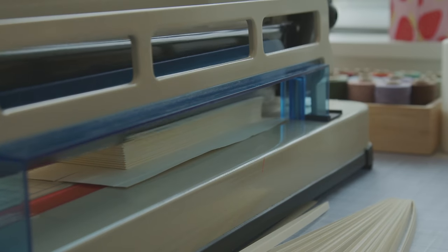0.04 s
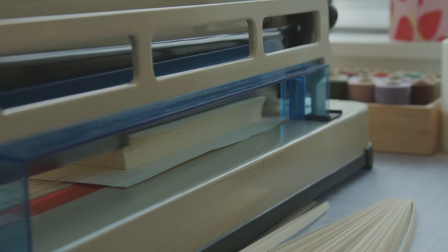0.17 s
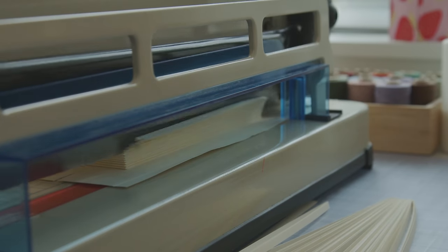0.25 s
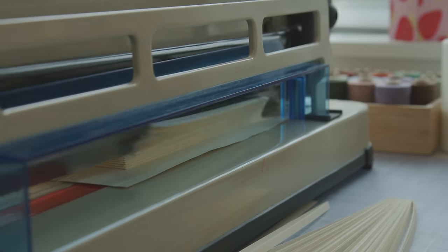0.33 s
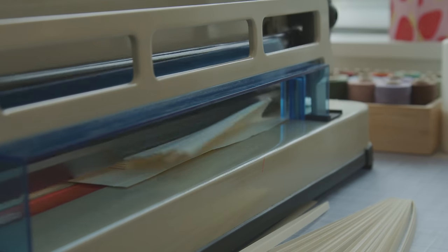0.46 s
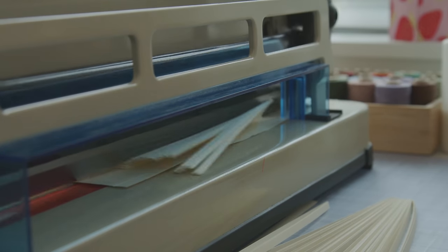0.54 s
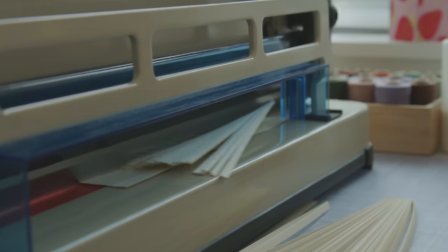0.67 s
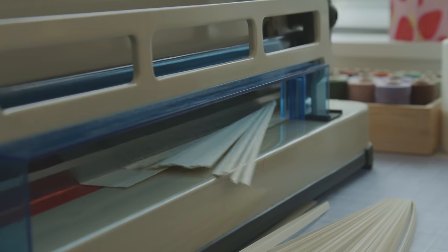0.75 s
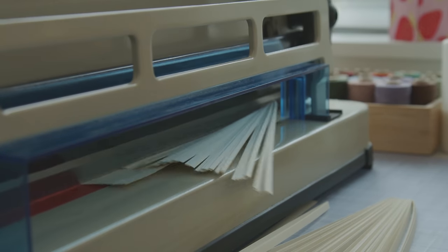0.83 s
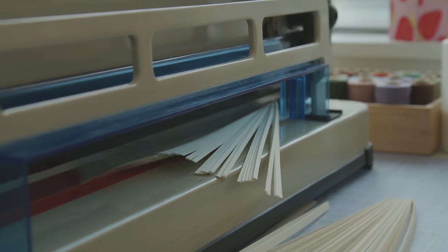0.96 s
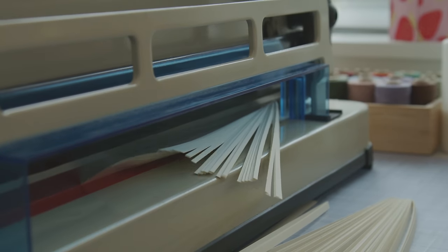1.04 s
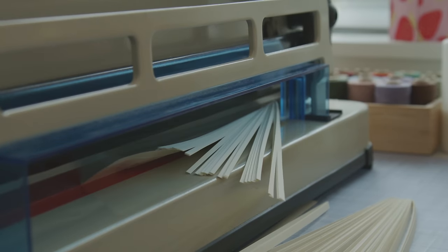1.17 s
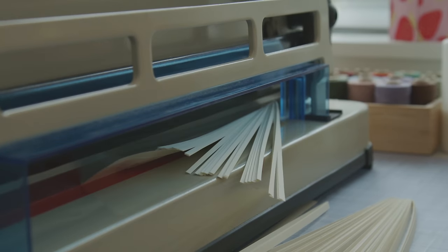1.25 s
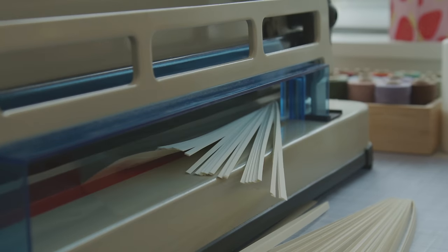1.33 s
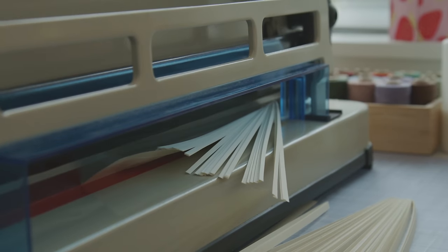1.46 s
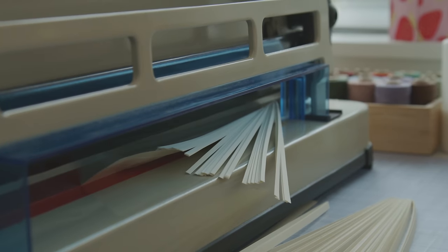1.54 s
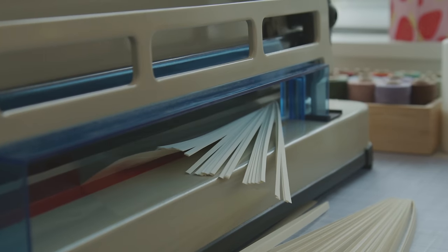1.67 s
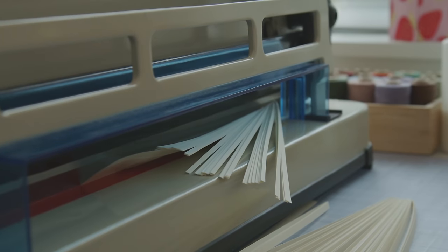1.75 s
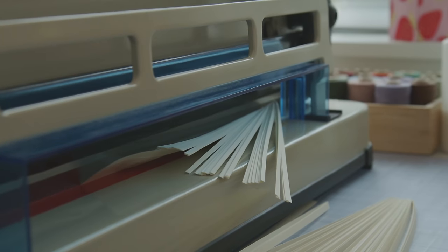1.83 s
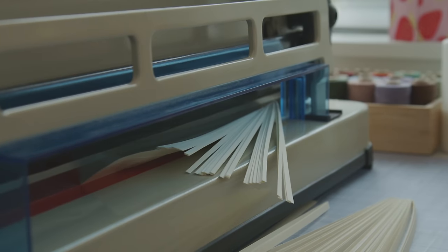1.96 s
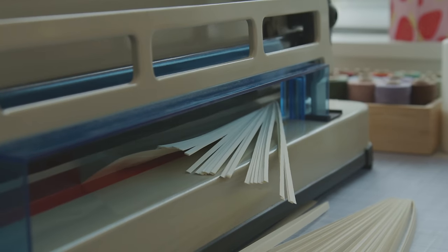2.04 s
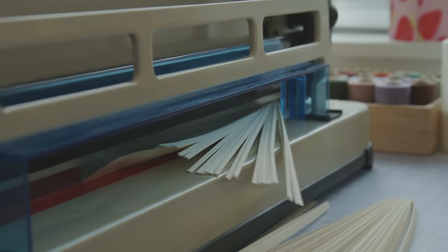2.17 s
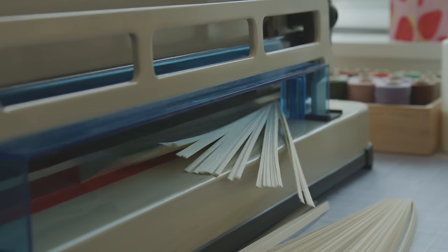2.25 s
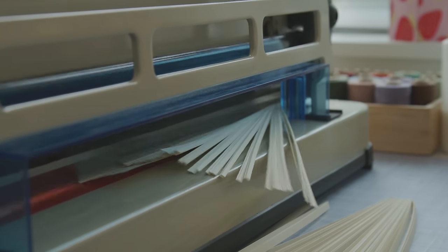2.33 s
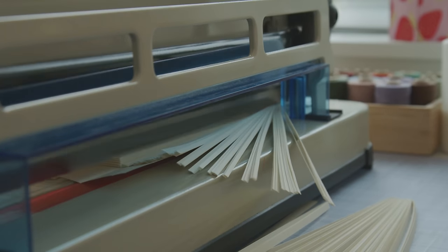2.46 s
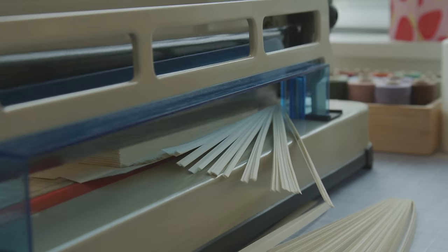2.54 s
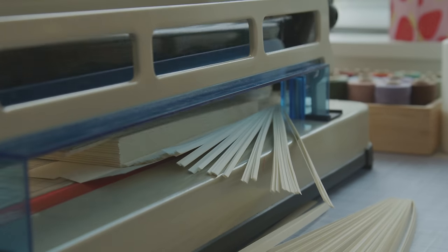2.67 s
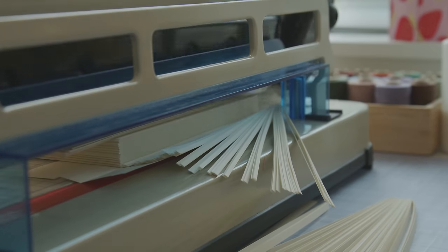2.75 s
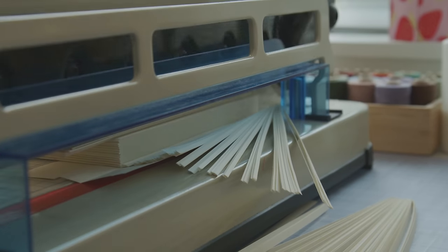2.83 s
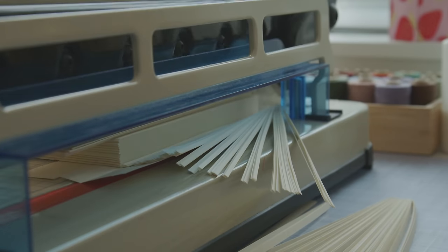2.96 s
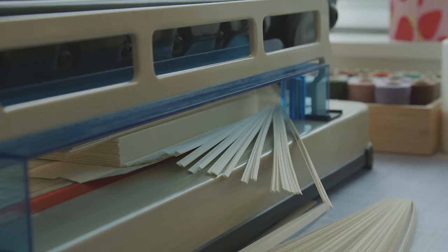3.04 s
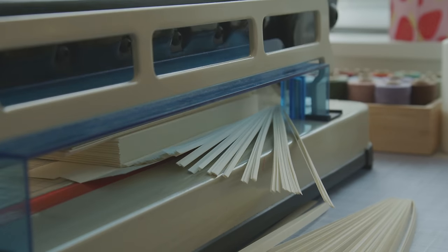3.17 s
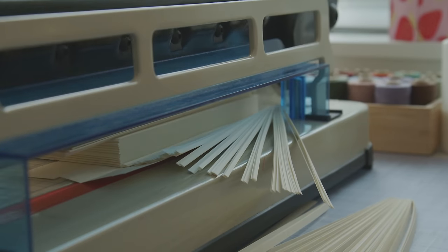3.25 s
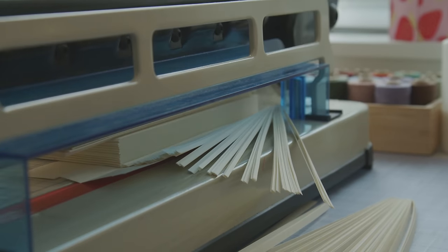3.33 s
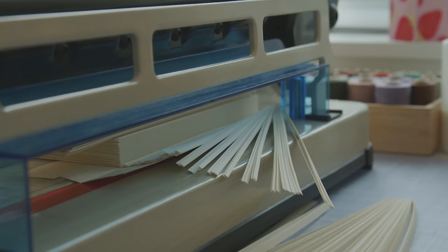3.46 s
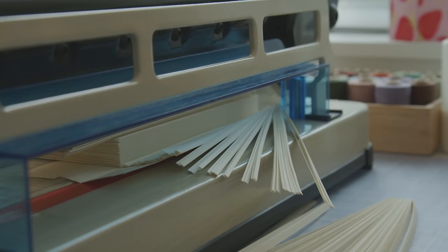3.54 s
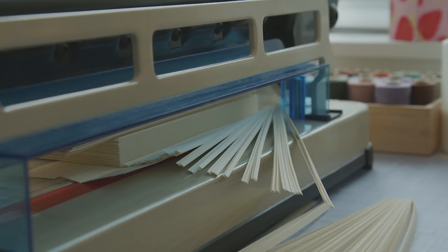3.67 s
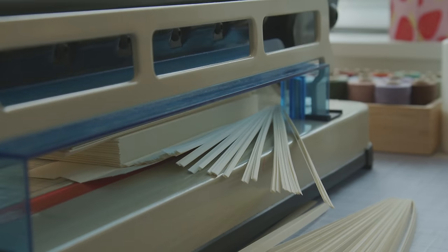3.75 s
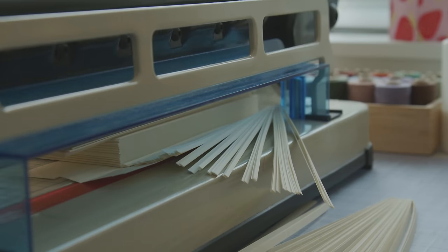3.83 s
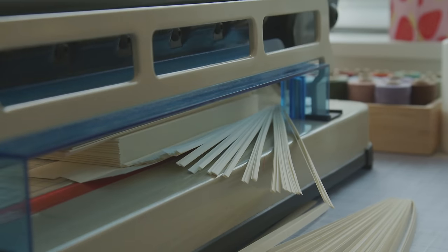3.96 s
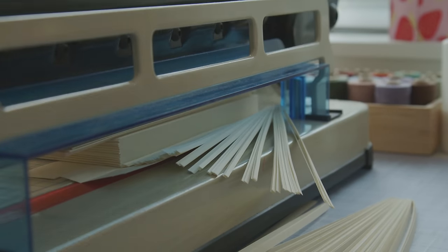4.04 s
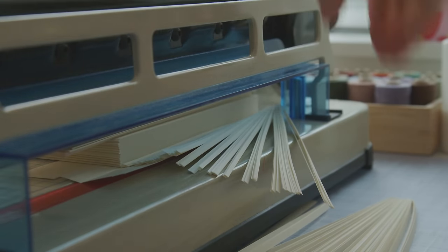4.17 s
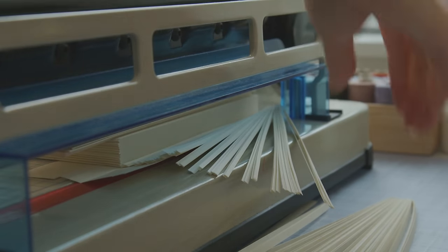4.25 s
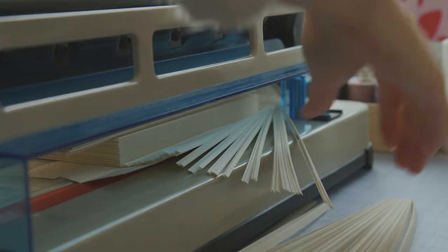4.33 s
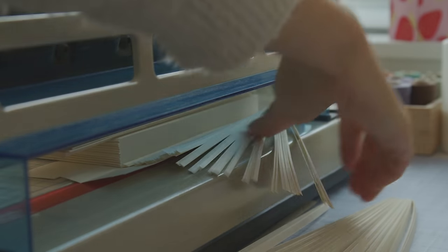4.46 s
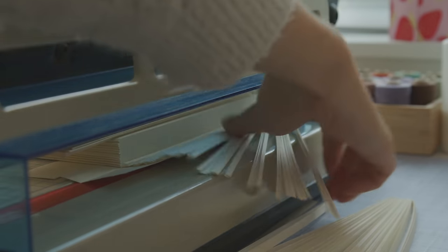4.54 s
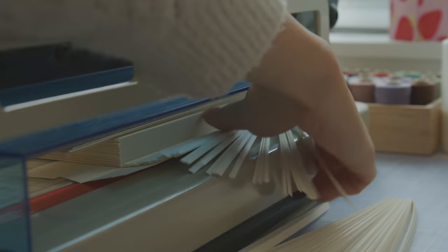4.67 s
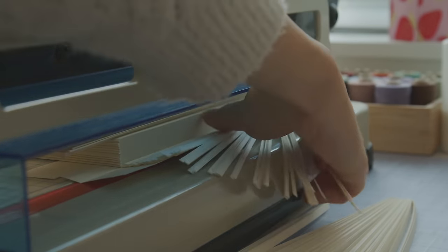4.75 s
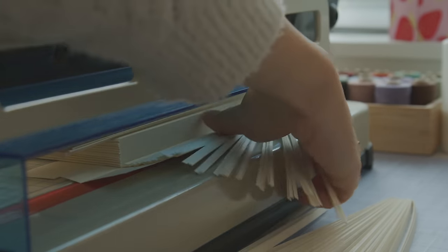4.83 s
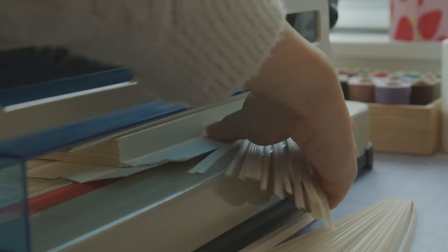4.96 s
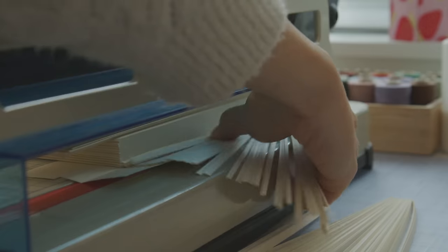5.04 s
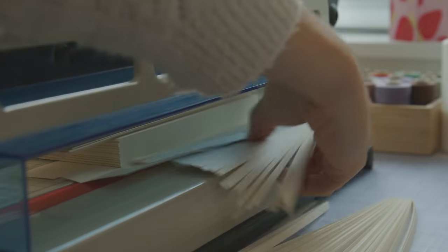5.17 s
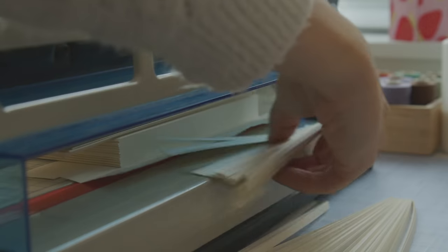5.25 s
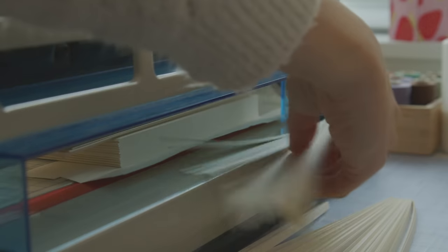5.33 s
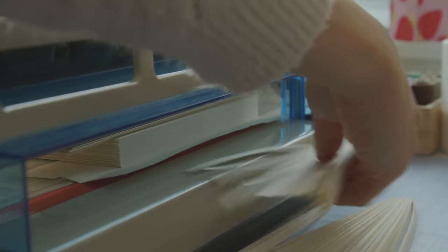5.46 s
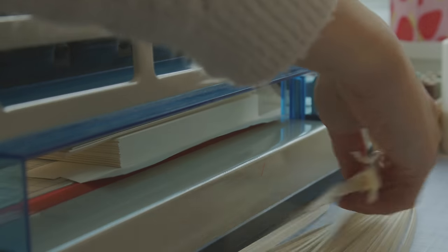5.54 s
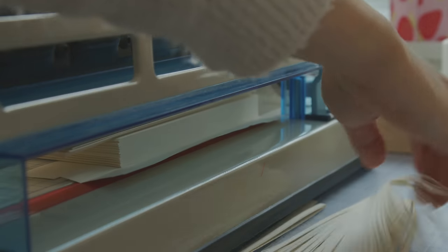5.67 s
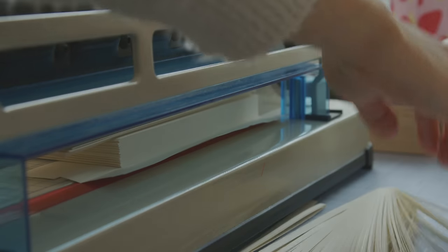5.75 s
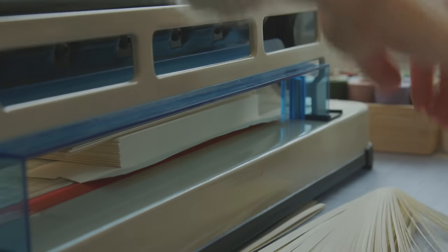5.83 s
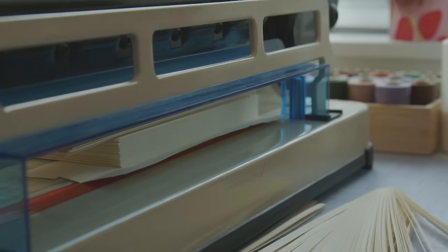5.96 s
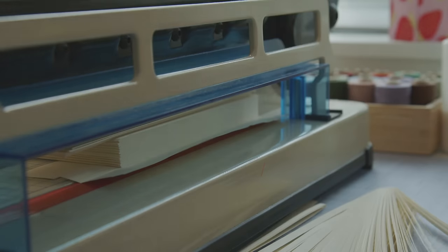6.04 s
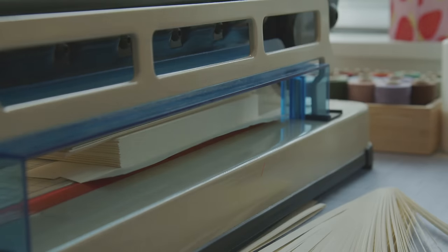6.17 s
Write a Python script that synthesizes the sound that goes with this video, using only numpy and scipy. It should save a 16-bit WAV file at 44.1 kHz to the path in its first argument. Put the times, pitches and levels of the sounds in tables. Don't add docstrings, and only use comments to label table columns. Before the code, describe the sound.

A lever paper cutter grinds through a thick stack, ratchets back, thuds and clunks home ringing, then a clamp knocks and cut paper strips rustle.

```python
import sys
import numpy as np
from scipy import signal
from scipy.fft import rfft, irfft, next_fast_len
from scipy.io import wavfile
from scipy.ndimage import map_coordinates

SR = 44100
rng = np.random.default_rng(int(sys.argv[2]) if len(sys.argv) > 2 else 0)


def wav_out(sig):
    wavfile.write(sys.argv[1], SR, np.round(np.clip(np.atleast_2d(sig).T, -1, 1) * 32767).astype(np.int16))


def voltage_ratio(decibels):
    exponent = np.asarray(decibels, float) / 20
    return 10 ** exponent


N = 273287


def unit(x):
    return x / np.sqrt(np.mean(x ** 2) + 1e-20)


def along(points, hz):
    f, v = np.transpose(points)
    return np.interp(np.log(hz + 1), np.log(f + 1), v)


def wobble(rate):
    knots = rng.standard_normal(int(N * rate / SR) + 4)
    return map_coordinates(knots, [np.arange(N) * rate / SR])


def filtered(x, response):
    m = next_fast_len(N + SR // 2)
    return irfft(rfft(x, m) * response(np.fft.rfftfreq(m, 1 / SR)), m)[..., :N]


def peak(f, hz, width):
    return 1j * f * width / (hz * hz - f * f + 1j * f * width)


def notched(x, notches):
    def response(f):
        return np.prod([1 - depth * peak(f, hz, width) for hz, width, depth in notches], axis=0)
    return filtered(x, response)


def body(x, modes):
    def response(f):
        h = sum((-1) ** k * voltage_ratio(db) * peak(f, hz, width) for k, (hz, width, db) in enumerate(modes))
        low, high = .8 * modes[0][0], 1.25 * modes[-1][0]
        h = h * ((1j * f / low) / (1 + 1j * f / low) / (1 + 1j * f / high)) ** 3
        return h / np.sqrt(np.mean(abs(h) ** 2))
    return filtered(x, response)


def friction(levels_db, grain_db, judder_db, surge_db=1, chatter_db=0):
    judder = judder_db * wobble(60) + chatter_db * wobble(350)
    shape = (len(levels_db), N)
    slips = voltage_ratio(grain_db * rng.exponential(size=shape)) * rng.standard_normal(shape)
    rows = [voltage_ratio(db) * unit(voltage_ratio(judder + surge_db * wobble(18)) * slip) for db, slip in zip(levels_db, slips)]
    return np.array(rows)


def strokes(rows):
    flank_power = 1.136
    t, power = np.arange(N) / SR, np.full((2, N), 1e-15)
    for s, db, rise, fall, second_db in rows:
        away = np.where(t < s, (s - t) / rise, (t - s) / fall)
        power += voltage_ratio(2 * (db - 20 * away ** flank_power)) * voltage_ratio([[0], [2 * second_db]])
    return 10 * np.log10(power)


def contacts(rows, tick_share=0.71, lead=0, rise=0.00024):
    force, t = np.zeros((4, N + SR)), np.arange(SR // 12) / SR
    for s, plate_db, frame_db, shell_db, tick_db, length in rows:
        life = length * np.array([[1.1], [1], [.9], [tick_share]]) + 0.00043
        burst = np.exp(-t / life) * (1 - np.exp(-t / rise)) * rng.standard_normal((4, len(t)))
        burst *= np.sqrt(1 + np.array([[.012], [.007], [.001], [0]]) / life)
        levels = voltage_ratio([[frame_db], [plate_db], [shell_db], [tick_db]])
        force[:, round((s - lead) * SR):][:, :len(t)] += levels * burst
    return force[:, :N]


def blows(rows, tick_db):
    return [(s, db, db + weight, db + hard, db + hard + tick_db, length)
            for s, db, weight, hard, length in rows]


def crackles(rows, length, plate_db, frame_db):
    return [(s, db + load + plate_db, db + load + frame_db, db, db + crisp, length)
            for s, db, crisp, load in rows]


def rings(rows, rise):
    out, t = np.zeros(N + 2 * SR), np.arange(SR) / SR
    for s, hz, db, t60 in rows:
        swell = 1 - np.exp(-t / max(rise, 1 / hz))
        out[round(s * SR):][:SR] += voltage_ratio(db - 60 * t / t60) * swell * np.sin(2 * np.pi * hz * t)
    return out[:N]


def push(force, names, rows):
    for name, row in zip(names, rows):
        force[name] += row


# pitch_hz, width_hz, level_db
FRAME = [(134, 13, -17), (191, 14, -16.5), (232.7, 24, -6), (277.4, 31.2, -3), (348, 22, 4), (405, 42, -2),
         (443.8, 27, -0.5), (538, 35, -4), (649, 48, -5)]
PLATE = [(727, 91, 0.5), (802.6, 38.4, 8.5), (893, 53, 4), (958, 56, 6), (1082, 57, 5), (1134, 45, 3),
         (1268, 50, -2), (1330, 40, -0.5), (1406, 36, 0), (1553, 43, -1.5), (1660, 1200, -7.5)]
SHELL = [(1680, 80, 3.5), (1903, 90, 4.5), (2037, 215, 1), (2330, 44, -4), (2804, 200, -2), (3246, 220, -2),
         (3465, 330, -4), (4200, 680, -4.5), (5050, 900, -12)]
FIBRE = [(6450, 3300, -4), (9120, 1940, 0), (11200, 2900, -4), (13000, 4900, -21)]
TABLE = [(67, 24, -3), (100, 20.5, 1.5), (134, 14, 3.5), (165, 55, 0.5), (207, 14, 0)]
SHEET = [(1576, 620, -3), (3410, 800, -1), (4300, 950, 3), (5010, 1020, -1.5)]
HISS = [(6470, 2300, 0), (8360, 3060, 3.5), (10960, 5200, -1), (15000, 3200, -9.5)]
CLAMP = [(1500, 460, 1), (2050, 330, 3), (2600, 170, -3), (3080, 480, -2), (4000, 640, -3),
         (4620, 570, -4.5)]
EDGE = [(8900, 300, 0)]
PARTS = dict(frame=FRAME, plate=PLATE, shell=SHELL, fibre=FIBRE, table=TABLE,
             sheet=SHEET, hiss=HISS, clamp=CLAMP, edge=EDGE)


def resound(force, names):
    return voltage_ratio(-1.5) * sum(body(force[name], PARTS[name]) for name in names)


# pitch_hz, level_db (per Hz)
AIR = [(25, -23.5), (50, -34.5), (65, -11), (160, -2), (250, 3), (400, -10.5), (750, -1), (1000, -12),
       (1400, -6), (2000, -11), (3200, -16.5), (5000, -28.5), (10000, -29), (15500, -32.5)]


def air():
    hush = filtered(rng.standard_normal(N), lambda hz: voltage_ratio(along(AIR, hz)))
    return voltage_ratio(-66 + wobble(3) + wobble(15)) * unit(hush)


# pitch_hz, t60_s
ROOM = [(200, 0.24), (1000, 0.23), (4000, 0.29), (12000, 0.17)]


def room(x):
    out, step = np.zeros(N + 2 * SR), SR // 4
    for start in range(0, N, step):
        hz, t, z = signal.stft(rng.standard_normal(SR // 2), SR, nperseg=256)
        decay = voltage_ratio(-60 * t / along(ROOM, hz)[:, None])
        tail = signal.istft(z * decay, SR, nperseg=256)[1]
        wet = signal.fftconvolve(x[start:start + step], tail / np.linalg.norm(tail))
        out[start + SR // 200:][:len(wet)] += wet
    return out[:N]


# time_s, level_db
CUT = [
    (0, -38),
    (.07, -38.5),
    (.255, -33),
    (.36, -33.5),
    (.47, -31.5),
    (.62, -34.5),
    (.78, -40),
    (.865, -46),
    (.9, -68),
]
# over_db (over the force), swing_share, drift_db_per_s (as the stack thins)
CUT_PARTS = [
    (-2, 0.9, 0.5),
    (1.5, 1.05, -1.8),
    (-5.5, 1.12, -9.5),
    (-12.5, 1.17, -6.5),
    (-29, 0.91, 15),
]


def shearing_db():
    t, (s, db) = np.arange(N) / SR, np.transpose(CUT)
    force_db = np.interp(t, s, db, right=-200)
    return [db.max() + over + share * (force_db - db.max()) + drift * t for over, share, drift in CUT_PARTS]


def shear(force):
    rubbing = friction(shearing_db(), grain_db=2.5, judder_db=1.1, surge_db=.4, chatter_db=1.1)
    push(force, ["frame", "plate", "shell", "fibre", "table"], rubbing)


# peak_s, level_db, rise_s, fall_s (both over 20 dB), second_db (unused)
SQUEAL = [
    (.07, -62, .1, .08, 0),
    (.3, -60, .06, .1, 0),
    (.44, -52, .07, .09, 0),
    (.56, -59, .05, .12, 0),
]


def squeal(force):
    push(force, ["edge"], friction(strokes(SQUEAL)[:1], grain_db=0, judder_db=1))


# peak_s, level_db (frame), rise_s, fall_s (both over 20 dB), second_db (plate over frame)
MOVES = [(1.0, -56, 0.41, 0.06, 2.5), (1.16, -58.5, 0.22, 0.24, -5.5), (1.45, -69.5, 0.25, .5, -15),
         (2.11, -57.5, 0.15, 0.92, -4), (2.36, -51.5, 0.15, 0.072, -5), (2.7, -54.5, 0.58, 0.69, -0.7),
         (3.38, -61, 0.52, 0.24, -2.3), (3.52, -55, 0.11, 0.27, -1), (3.85, -67.5, .6, 1, -8),
         (4.7, -57.5, 0.088, 0.53, 0.5), (5.1, -64.5, 0.48, 0.78, 0), (5.71, -63.5, 0.52, 0.32, -16),
         (6.0, -71, 0.78, 0.59, 0.5)]
# same columns, second_db unused
SHAKES = [
    (.34, -50.5, 0.12, 0.11, 0),
    (1.3, -72.5, 0.86, 0.76, 0),
    (.85, -72, .3, 0.23, 0),
    (1.05, -65, 0.044, .06, 0),
    (1.19, -65, .03, .08, 0),
    (1.67, -66, 0.04, 0.21, 0),
    (2.21, -60, .05, .15, 0),
    (2.385, -51, 0.032, 0.1, 0),
    (3.5, -60, 0.13, 0.22, 0),
]


def lever(force):
    travel_db = np.maximum(strokes(MOVES), [[-70], [-120]])
    rubbing = friction([*travel_db, strokes(SHAKES)[0]], grain_db=1.5, judder_db=1.5)
    push(force, ["frame", "plate", "table"], rubbing)
    force["table"] += voltage_ratio(-15.5) * rubbing[0]


# start_s, level_db (sheet), crisp_db (hiss over sheet), load_db (steel over sheet)
SNAPS = [(.102, -54, 7.5, 5), (.111, -53, 8, 0), (.182, -48, 12.5, -10), (.198, -50, 10, -5),
         (.211, -53, 11, -5), (.244, -54, 3, 25), (.26, -53, 3, 25), (.272, -50, 7, 2),
         (.348, -54.5, 4, 16), (.381, -48, 7.5, 15), (.425, -53, 5, 20), (.467, -52.5, 7, 12),
         (.53, -55, 1, 24), (.666, -56, 6, 10), (.707, -50, 6, 3), (.722, -59, 5, 7), (.769, -54, 6, 5),
         (.788, -55, 6, 8), (.808, -57, 6, 5), (.222, -45, 10, -5), (.62, -46.5, 4, 4),
         (.484, -49.5, 12, 14), (.522, -48, 8.5, 0), (.544, -37.5, 8, 4), (.696, -48, -1, 14.5),
         (.731, -49.5, 9.5, 11), (.739, -44, 4.5, 9), (.832, -48, 5.5, 7.5), (.859, -48, 1.5, 5.5),
         (4.94, -36.5, 1, -11.5)]


def snaps(force):
    rows = crackles(SNAPS, 0.0057, plate_db=-4.5, frame_db=-5.5)
    push(force, ["frame", "plate", "sheet", "hiss"], contacts(rows, tick_share=0.62))


# peak_s, level_db (sheet), rise_s, fall_s (both over 20 dB), second_db (hiss over sheet)
SLIDES = [(.96, -66, 0.2, 0.16, -3), (1.196, -63.5, 0.12, 0.14, -1.5), (2.36, -63, 0.15, 0.1, 2),
          (2.5, -67, .3, .4, -10), (2.79, -56, 0.039, 0.24, 1.5), (2.9, -54, 0.25, 0.15, 1),
          (3.222, -69, 0.42, 0.2, -6), (4.95, -50.5, .008, 0.082, -14), (5.2, -46, 0.23, 0.21, -5),
          (5.784, -63, 0.24, 0.21, -9), (6.1, -78, .55, .55, -8)]
BRUSHES = [(1.128, -63.5, .03, .03, -1), (3.74, -71.5, 0.033, 0.087, -10), (3.55, -62.5, .03, 0.1, -12),
           (3.78, -61, 0.075, 0.029, -2), (3.97, -71.5, 0.21, 0.28, -7.5), (4.575, -59.5, 0.055, .055, -2),
           (4.65, -58, 0.082, 0.057, -3.5), (5.622, -56, .009, .012, 4), (5.646, -54, .018, .014, 4),
           (5.756, -48, .005, .012, 5), (5.765, -46, .005, .014, 7), (5.773, -49, .014, .012, 6),
           (5.69, -70, .12, .1, 0)]


def sliding_db():
    return strokes(SLIDES + BRUSHES)


def slide(force):
    push(force, ["sheet", "hiss"], friction(sliding_db(), grain_db=2.0, judder_db=1.4))


def fibres(force):
    fibres_per_s, spread_db, tear_db, catch_db = 64, 14, -2, 2.5
    loudest_db = np.maximum(shearing_db()[2] + tear_db, sliding_db()[0] + catch_db)
    draw = rng.random((600, 2))
    at = np.cumsum(-np.log(draw[:, 0])) / fibres_per_s
    size_db = np.interp(at * SR, np.arange(N), loudest_db, right=-150) - spread_db * np.sqrt(draw[:, 1])
    rows = [(s, db, 3, -8) for s, db in zip(at, size_db) if db > -75]
    loose = crackles(rows, 0.0021, plate_db=-7, frame_db=-5.5)
    push(force, ["frame", "plate", "sheet", "hiss"], contacts(loose, tick_share=0.62))


# start_s, pitch_hz, level_db, t60_s
KNOCKS = [(1.1675, 13000, -42, .008), (1.1675, 6800, -45, .01), (1.652, 2550, -42, .03),
          (1.168, 2950, -29.5, .035), (1.172, 348, -35.5, 0.051), (1.652, 950, -36, 0.041),
          (2.196, 910, -29, 0.036), (2.334, 1080, -33, .08), (2.3797, 365, -12, 0.032),
          (2.382, 265, -24, .05), (2.382, 540, -24, .04), (2.416, 350, -26, .06), (2.339, 350, -36, .06),
          (2.354, 360, -35, .06), (2.39, 960, -22, .03), (2.381, 940, -20.5, 0.045),
          (2.405, 350, -23, 0.05), (2.437, 360, -31, .06), (2.5, 365, -48.5, .5), (2.69, 372, -48.5, .4),
          (.987, 1080, -40.5, 0.14), (2.795, 910, -34.5, 0.042), (3.33, 380, -46.5, 0.16),
          (4.689, 806, -21.5, 0.083), (3.432, 1075, -31, .08), (2.797, 2300, -42, .04),
          (2.212, 290, -34.5, 0.075), (4.673, 325, -28.5, 0.12), (4.682, 410, -27.5, 0.096),
          (4.676, 1500, -33, .06), (1.168, 1800, -35.5, 0.047), (1.652, 1800, -33, .04),
          (2.335, 1950, -39.5, 0.08), (2.388, 1075, -32, 0.037), (4.682, 2050, -28, 0.04),
          (4.722, 350, -34, .06), (4.744, 380, -35, .05), (4.8, 370, -42, .06), (3.473, 400, -31, .07),
          (4.783, 348, -44, .12), (5.252, 1700, -45.5, .09), (5.64, 690, -52, .08), (5.724, 600, -46, 0.11),
          (5.398, 347, -45.5, 0.054), (5.434, 4700, -46, .03), (4.943, 4300, -39, 0.026),
          (5.74, 235, -52, 0.17), (1.17, 235, -43.5, .08), (4.675, 600, -32.5, 0.077),
          (5.434, 1700, -49, .04), (3.0, 4300, -61, 0.14), (3.405, 960, -34.5, 0.065)]


def knocks():
    return rings(KNOCKS, rise=.002)


# start_s, level_db (plate), weight_db (frame over plate), hard_db (shell over plate), contact_s
STOPS = [(.992, -41.5, -14.5, -14.5, 0.0056), (1.052, -72, 20.5, -9, 0.0072),
         (1.127, -54.5, 2.5, -3, 0.006), (1.416, -77, 21.5, -6, .0058), (1.474, -70.5, 11.5, .3, 0.0036),
         (1.6015, -56, -9, -8, 0.004), (1.65, -34.5, 0, -4.5, 0.0064), (1.697, -51.5, -2, -17, 0.0089),
         (1.72, -50, -2, -16, 0.0033), (2.196, -34.5, -6.5, -1.4, 0.0074), (2.211, -38, -6.5, -24, 0.013),
         (2.332, -40, -8, -12, 0.011)]


def stops(force):
    push(force, ["frame", "plate", "shell", "fibre"], contacts(blows(STOPS, tick_db=-2.5)))


# start_s, level_db (plate), weight_db (frame), hard_db (shell), contact_s
THUD = [(1.1675, -36.5, -1, 1, 0.009), (2.3755, -32.5, -21, -4, 0.0028), (2.3805, -29.5, 1, -19, 0.004),
        (2.391, -36.5, -5, -9, 0.0012), (2.406, -52, 12, -9, 0.0022), (2.434, -54, 13, -12, 0.0033),
        (1.187, -45.5, -9, 0, 0.014), (1.215, -51.5, -10, 0.5, 0.012), (2.795, -43, -18, 2.2, 0.003),
        (2.868, -48.5, -21.5, 5, 0.004), (2.895, -52, -5, -3, 0.004)]


def thuds(force):
    push(force, ["frame", "plate", "shell", "fibre"], contacts(blows(THUD, tick_db=-12.5)))


# start_s, level_db (sheet), crisp_db (hiss over sheet)
TICKS = [(1.483, -70.5, 8), (1.834, -69, 1), (1.961, -74, 2), (3.581, -63, 0.5), (3.627, -70, 4),
         (3.66, -66, -16), (3.70, -58, -6), (5.172, -48, 4), (5.227, -52, 3), (5.212, -52, 0),
         (5.308, -50, 0), (5.15, -50, 6), (5.196, -46, 0), (5.287, -49, 0), (5.33, -54, -2),
         (5.348, -54.5, -2), (5.874, -67, 8), (5.911, -71.5, 7), (6.018, -73, 6)]


def ticks(force):
    rows = crackles([(*row, 0) for row in TICKS], 0.0015, plate_db=0, frame_db=0)
    push(force, ["sheet", "hiss"], contacts(rows)[2:])


# start_s, level_db (plate), weight_db (frame), hard_db (shell), contact_s
RATCHET = [
    (1.903, -33, -15, -38, 0.012),
    (1.934, -47, -3, -37, 0.0047),
    (2.006, -34.5, -9, -46, 0.013),
    (2.045, -45, -2, -40, 0.0043),
    (2.103, -30.5, -30, -26.5, 0.0081),
    (2.117, -39, -4, -35, 0.0044),
    (2.133, -43.5, 4.5, -30, 0.0042),
]
# pitch_hz, level_db, t60_s
TOOTH = [(880, 0, .026), (1030, 1, .03), (1600, -11, .022), (2150, -13, .018), (2550, -19, .012),
         (3200, -24, .01)]
# pitch_hz, t60_s
PAWL = (6590, .12)


def ratchet(force):
    shares = voltage_ratio([[-8], [-14], [-1]])
    hits = contacts(blows(RATCHET, tick_db=0), lead=.0015)[:3]
    push(force, ["frame", "plate", "shell"], shares * hits)
    pawl_hz, pawl_t60 = PAWL
    teeth = [(row[0] - .002, hz, row[1] + 6 + db, t60) for row in RATCHET for hz, db, t60 in TOOTH]
    pawl = [(row[0] - .002, pawl_hz, row[1] + row[3] - 8, pawl_t60) for row in RATCHET]
    return rings(teeth, rise=.003) + rings(pawl, rise=.001)


# pitch_hz, t60_s
BARS = [(242, 1.1), (404, .45), (571, .9), (1075, .2)]
# start_s, then level_db of each bar
BAR_HITS = [
    (2.40, -54, -52, -43, -75),
    (3.49, -43, -54, -42, -62),
    (4.758, -75, -54, -75, -41),
    (4.79, -80, -80, -80, -41),
    (4.945, -75, -50, -75, -75),
]


def bars():
    rows = [(s, hz, db, t60) for s, *levels in BAR_HITS for (hz, t60), db in zip(BARS, levels)]
    return rings(rows, rise=.015)


# start_s, level_db (sheet), crisp_db (hiss over sheet), load_db (steel over sheet)
RUSTLES = [(2.767, -56, -2.5, -1.5), (4.554, -40.5, -5, -17), (5.187, -43, 1.5, -21),
           (5.25, -36.5, -3.5, -17), (5.397, -51, -3, 1), (5.433, -40.5, -8, -21), (5.443, -44.5, -7, -15),
           (5.039, -53, 1, -10.5), (5.14, -51, 5, -20), (5.27, -48, 2, -15), (5.618, -56, 2, 2),
           (5.638, -53, 3, 4), (5.723, -58, -2, 7), (5.745, -53, 2, -1), (5.764, -52, 5, 1),
           (5.786, -48, 1, -7), (5.811, -47, 0.5, -8)]


def rustles(force):
    rows = crackles(RUSTLES, 0.0085, plate_db=-2.5, frame_db=-3)
    push(force, ["frame", "plate", "sheet", "hiss"], contacts(rows, tick_share=0.84, lead=.002, rise=0.0034))


# start_s, level_db (plate), weight_db (frame), hard_db (shell), contact_s
CLUNKS = [
    (3.383, -49, 1, -27, 0.013),
    (3.406, -35.5, -13.5, -30, 0.0081),
    (3.418, -33.5, -11.5, -19, 0.015),
    (3.424, -33.5, -10.5, -7, 0.008),
    (3.4295, -26.5, -16, 1, 0.0095),
    (3.438, -32, -3, 4, 0.0097),
    (3.447, -32, -4, -4, 0.012),
    (3.478, -46, 4, -14, 0.0055),
    (3.455, -37.5, -5, -7, 0.0058),
    (3.5, -49, -3, -9, 0.012),
]


def clunks(force):
    hits = contacts(blows(CLUNKS, tick_db=-10.5), tick_share=0.76, rise=0.00067)
    push(force, ["frame", "plate", "shell", "fibre"], hits)


# start_s, pitch_hz, level_db, t60_s
BLADE = [(3.43, 1674, -40, .1), (3.43, 1895, -35, .1), (3.44, 3219, -46, .2), (3.45, 4527, -56, .2),
         (3.435, 7181, -52, .1), (3.45, 7843, -52, .27), (3.45, 10040, -55, .2), (3.432, 11260, -40, .08),
         (3.44, 14400, -64, .14)]
SPINE = [
    (3.43, 4050, -34, .04),
    (3.431, 4038, -35, .28),
    (3.43112, 4065, -35.5, .25),
]


def blade():
    twins = [(s, hz * 1.0028, db - 3, t60 * .5) for s, hz, db, t60 in BLADE]
    return rings(BLADE + twins + SPINE, rise=.002)


# start_s, level_db (plate), weight_db (frame), hard_db (clamp over plate), contact_s
CLAMPS = [
    (4.670, -30.5, -20, 0, 0.0094),
    (4.676, -29.5, -18, 0.5, 0.0053),
    (4.682, -24, -16, -1, 0.0043),
    (4.690, -28.5, -16, -9, 0.005),
    (4.700, -35, -12, -13, 0.0044),
    (4.725, -45.5, 1, -5, 0.0064),
    (4.742, -45, -3, -6, .005),
    (4.79, -47, -6, -8, .008),
    (4.757, -44, -10, -2.5, 0.004),
    (4.765, -45.5, -1, -10, 0.012),
]


def clamp(force):
    hits = contacts(blows(CLAMPS, tick_db=-13.5), tick_share=0.75, rise=0.00081)
    push(force, ["frame", "plate", "clamp", "fibre"], hits)


# start_s, pitch_hz, level_db, t60_s
LATE_KNOCKS = [(5.756, 8600, -48, .02), (5.757, 11000, -46, .02), (5.764, 11000, -42, .035),
               (5.787, 11000, -50, .02), (5.275, 7500, -56, .06), (5.444, 4800, -49, .03),
               (5.431, 4900, -48, .02), (5.19, 4400, -48, .06), (5.205, 4600, -48, .05)]


def late_knocks():
    return rings(LATE_KNOCKS, rise=.002)


# pitch_hz, width_hz, depth (0-1)
SHADOW = [(2386, 260, .65), (2680, 300, .55)]


def scene():
    force = {name: np.zeros(N) for name in PARTS}
    for source in (shear, squeal, lever, snaps, slide, fibres, stops, thuds, ticks, rustles, clunks, clamp):
        source(force)
    knock = knocks() + ratchet(force) + late_knocks()
    ring = bars() + blade()
    cutter = resound(force, ["frame", "plate", "shell", "fibre", "table", "clamp", "edge"])
    paper = resound(force, ["sheet", "hiss"])
    wet = room(cutter + .5 * paper + .6 * knock + .3 * ring)
    around = notched(voltage_ratio(-7.5) * wet + air(), SHADOW)
    return (cutter + paper + knock + ring + around)[None]


def band_limit(x):
    return signal.sosfilt(signal.butter(12, 16480, fs=SR, output="sos"), x)


# pitch_hz, width_hz, depth (0-1)
NOTCHES = [(2466, 450, 0.22), (5770, 460, 0.42)]


def record(dry):
    def microphone(f):
        bass_cut = (1j * f / 45 / (1 + 1j * f / 45)) ** 4
        return bass_cut * (f < 15850)
    mix = filtered(notched(dry, NOTCHES), microphone)
    return band_limit(mix)


dry = scene()
out = record(dry)
wav_out(out)
```